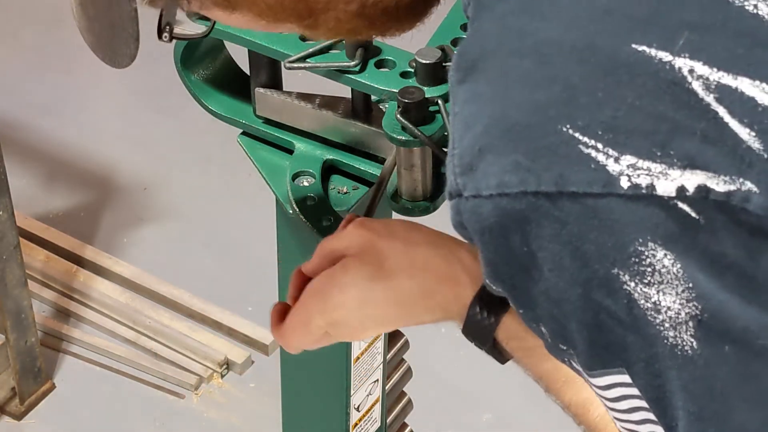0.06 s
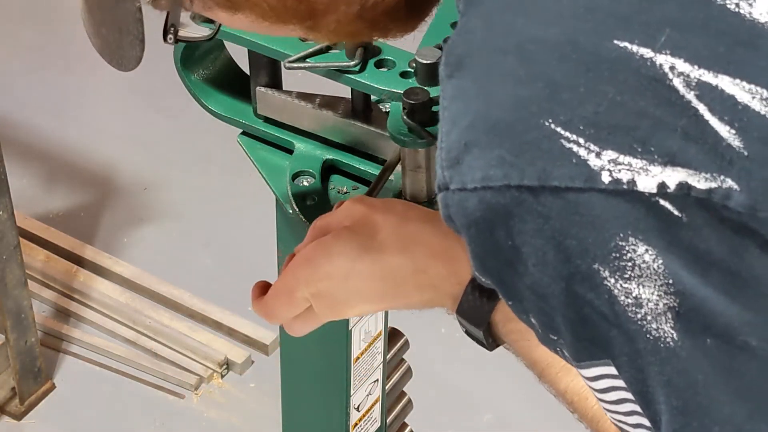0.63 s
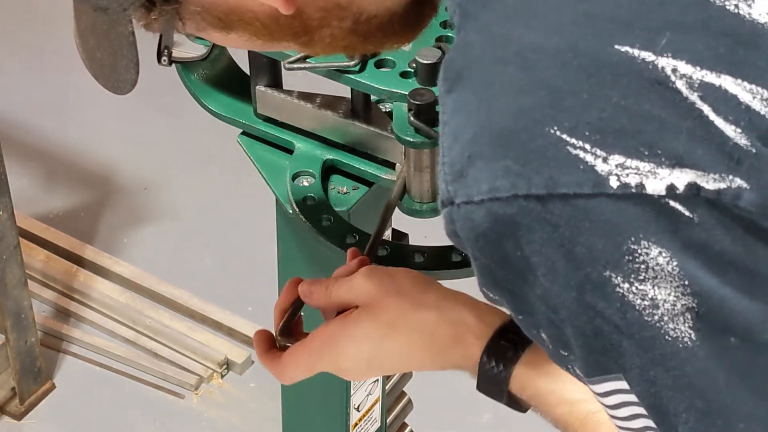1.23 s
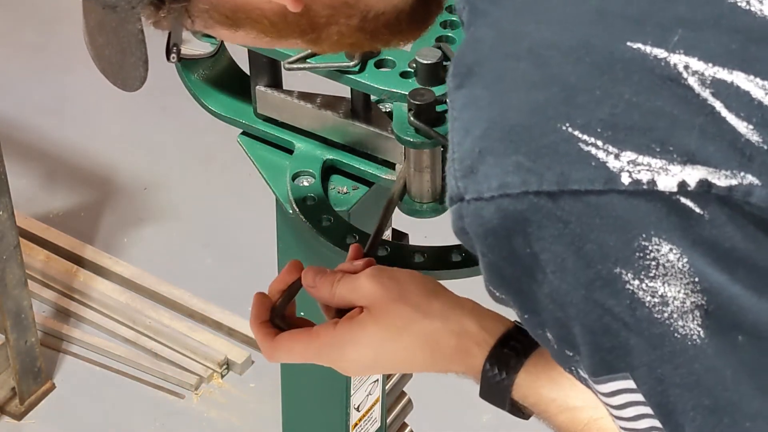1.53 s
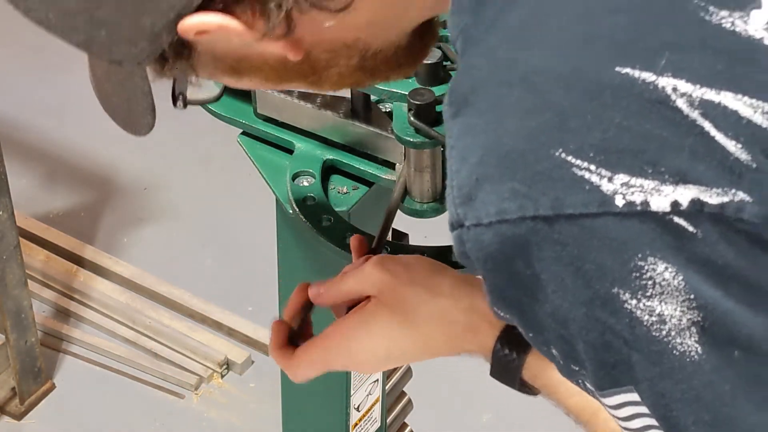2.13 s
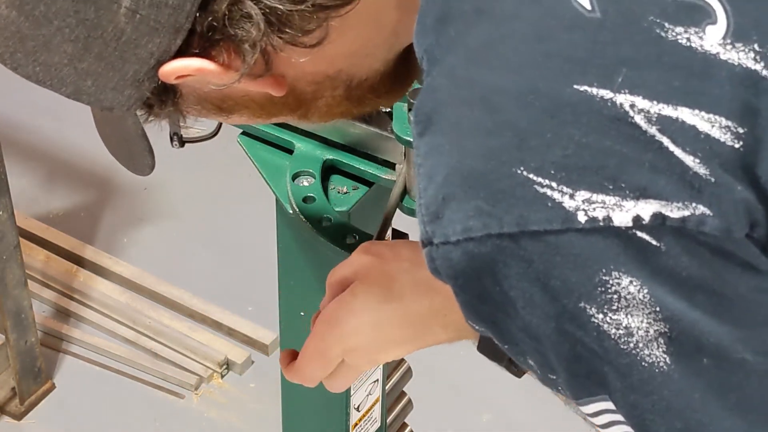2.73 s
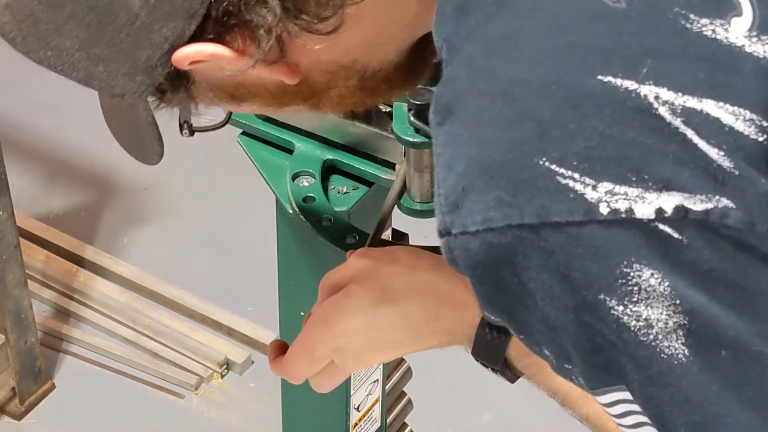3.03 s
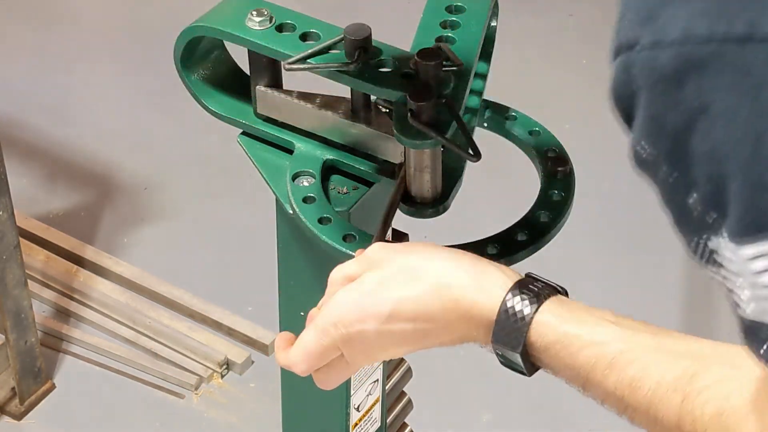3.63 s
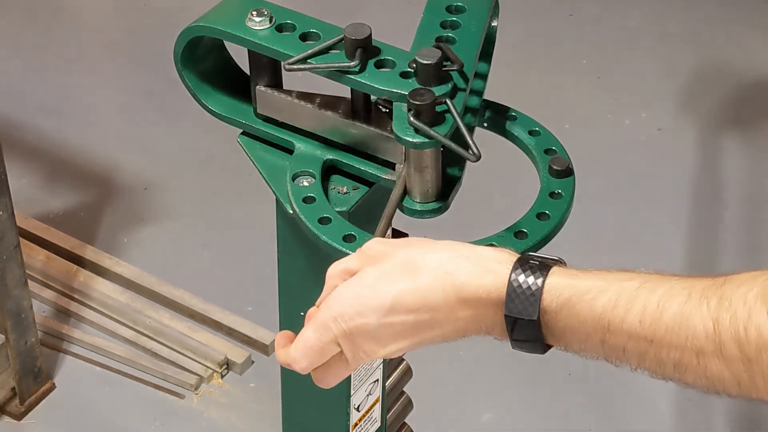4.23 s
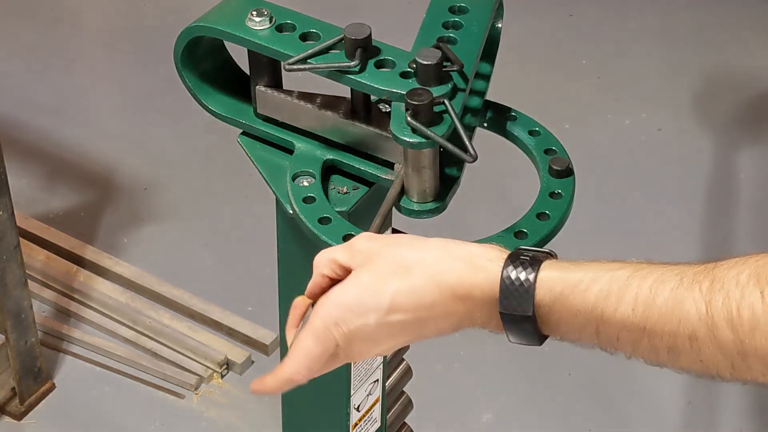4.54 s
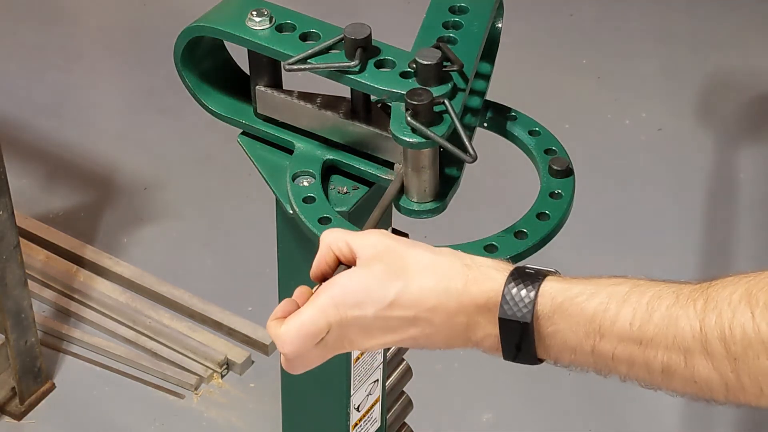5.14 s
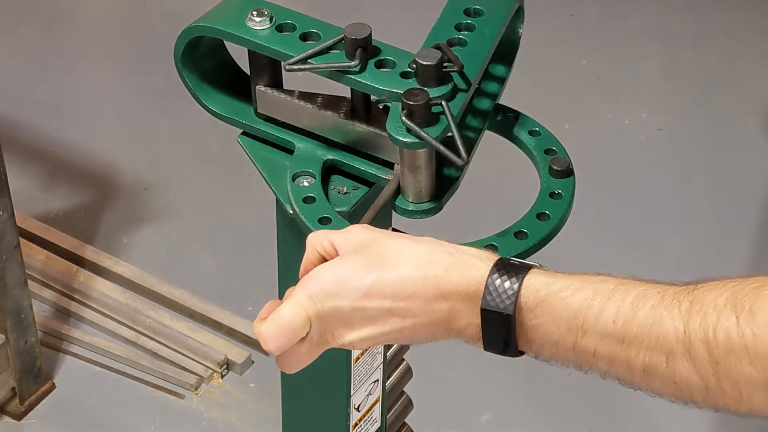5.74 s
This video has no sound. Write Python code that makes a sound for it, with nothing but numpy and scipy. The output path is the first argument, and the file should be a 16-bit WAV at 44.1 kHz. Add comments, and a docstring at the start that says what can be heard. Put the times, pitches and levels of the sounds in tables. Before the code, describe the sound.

In a small, hard-walled workshop, a steel die drops into a manual bar bender with one sharp, bright clank that rings briefly. Loose metal parts then knock lightly, with very faint squeaks and a soft rub of the bending arm. Near the end a steel bar hits its stop with a second, quieter ringing clank, and a low hum swells. The sound is close, with a short echo and faint hiss.

```python
"""Steel clanks on a manual bar bender in a small, hard-walled workshop.
A die clanks home, later the round bar drops against its stop; between them loose parts knock, squeak
and slide. Each impact excites a dense crowd of short-lived modes and a few long-ringing ones, and the
room adds a diffuse echo. Beneath lie a low rumble, a hum that swells near the end, and steady hiss."""
import sys
import numpy as np
from scipy import signal
from scipy.fft import rfft, irfft
from scipy.io import wavfile

SR = 44100
rng = np.random.default_rng(int(sys.argv[2]) if len(sys.argv) > 2 else 0)


def transcribe(u):
    """Save the signal u as a 16-bit wav file named by the first command-line argument.

    u: samples, shape (n,) or (channels, n), limited to [-1, 1]; the rate is SR.
    q: integer samples, one column per channel.
    """
    v = np.clip(np.atleast_2d(u).T, -1, 1)
    q = np.round(v * 32767).astype(np.int16)
    wavfile.write(sys.argv[1], SR, q)


N = 254442
TIME = np.arange(N) / SR

# Each row: start in seconds, level in dB, treble in dB, chatter time in seconds, spot resonance in Hz.
DIE_CONTACTS = [(.9035, -39, -13, 0.11, 2900), (.9095, -35.5, 0, 0.097, 12800),
                (.9145, -23, -11, 0.027, 3000), (.9337, -12, 10, .011, 11900),
                (.9382, -10.5, 2.5, 0.013, 3500), (.947, -22, 4, .045, 200)]
# Short-lived modes. Each row: frequency in Hz, relative level in dB.
DIE_SPECTRUM = [(110, -24), (210, -13), (480, -31.5), (1200, -15), (2000, -5), (3200, 1), (5100, -3.5),
                (5900, -11.5), (7500, -5), (9900, -8), (10700, -19.5), (11900, -2.5), (12600, -8.5),
                (15000, -1.5)]
# Long modes. Each row: frequency in Hz, relative level in dB, time to decay by 60 dB in seconds.
DIE_RING = [(128, -28, .7), (2252, -9, .45), (2738, -3, .4), (3186, -8, .45), (3254, -9, .35),
            (3493, -8, .5), (3570, 2, .33), (4131, -11, .5), (4430, -4, .42), (4461, -6, .38),
            (5092, -6, .38), (7022, -7, .36), (7062, -7, .38), (7154, -6, .35), (7192, -1, .28),
            (7716, -4, .34), (7746, -4, .32), (7784, -7, .38), (7881, -2, .35), (9041, -10, .32),
            (9969, -8, .25), (10112, -9, .26), (12047, -5, .24), (14077, -9, .24), (14559, -5, .18),
            (15226, -6, .22), (15530, -6, .23)]

def die_clank():
    """Impact excitation: the die seats in a quick run of contacts, each driving its modes."""
    return strike(DIE_CONTACTS, DIE_SPECTRUM, DIE_RING, ring_db=-3.5, room_db=1.33, coherent_hz=7050,
                  rise_s=0.00021, spot_width=0.059, spot_db=2, bass_db_per_octave=0.87, pan_db=6)

# Each row: start in seconds, level in dB, treble in dB, chatter time in seconds, spot resonance in Hz.
BAR_CONTACTS = [(4.9305, -46, -3.5, 0.063, 1495), (4.9528, -27.5, 11, 0.079, 14700),
                (4.957, -21, 6.5, 0.039, 3530), (4.9652, -27, -9, 0.018, 3080),
                (5.063, -39, -12, 0.016, 2560)]
# Short-lived modes. Each row: frequency in Hz, relative level in dB.
BAR_SPECTRUM = [(110, -32.5), (220, -21), (380, -8), (580, -21.5), (1200, -10), (2200, -1), (3200, 5.5),
                (4000, -2), (5600, -12), (7400, -6.5), (8200, -14.5), (9200, -11), (11500, -15),
                (15500, -13.5)]
# Long modes. Each row: frequency in Hz, relative level in dB, time to decay by 60 dB in seconds.
BAR_RING = [(1900, -13, .42), (2166, -13, .5), (2390, -5, .36), (2455, -4, .43), (2686, -4, .36),
            (2740, -8, .33), (2874, -5, .4), (3041, -3, .4), (3256, -2, .34), (3407, -6, .4),
            (3445, -5, .32), (3497, -1, .44), (4433, -11, .42), (4570, -12, .33), (6704, -8, .28),
            (7151, -13, .33), (7472, -3, .27), (7548, -6, .32), (8890, -12, .28), (8925, -10, .27),
            (9937, -13, .29), (14100, -11, .2)]

def bar_drop():
    """Inelastic collision: the bar hits its stop, rings and makes one small rebound."""
    return strike(BAR_CONTACTS, BAR_SPECTRUM, BAR_RING, ring_db=-2.5, room_db=-0.5, coherent_hz=5000,
                  rise_s=0.00086, spot_width=0.036, spot_db=9.5, bass_db_per_octave=2.3, pan_db=1.2)

# Each row: start in seconds, level in dB, treble in dB, chatter time in seconds, spot resonance in Hz.
FRAME_CONTACTS = [(.662, -49.5, -3, 0.084, 4600), (0.7279, -48, -4, 0.041, 2330),
                  (0.739, -43, 3, .03, 2590), (.832, -57, 10, 0.067, 1480), (.888, -51.5, 7.5, 0.34, 3100),
                  (1.253, -32, 4, 0.025, 4160), (1.663, -44, -1.5, 0.046, 4270),
                  (2.099, -59.5, -2, .1, 1800), (2.127, -51.5, -6, 0.066, 2850),
                  (2.591, -56.5, 2, .07, 3520), (2.777, -48, 19.5, 0.018, 2550),
                  (3.672, -62.5, 12, 0.11, 2900), (4.057, -45, 13, 0.039, 6200),
                  (4.239, -47.5, -1, .06, 2520), (4.293, -40.5, -21, 0.016, 2800),
                  (4.717, -47.5, -9.5, 0.053, 3500), (4.764, -47, -5, 0.0095, 3040),
                  (4.816, -49, -5, 0.015, 3200), (5.335, -51.5, 5, 0.1, 2900)]
# Short-lived modes. Each row: frequency in Hz, relative level in dB.
FRAME_SPECTRUM = [(120, -12.5), (300, -10.5), (600, -11.5), (1000, -2.5), (1900, -1), (3200, -1.5),
                  (4400, -10), (5600, -14.5), (7300, -16.5), (11000, -21), (15500, -22)]
# Long modes. Each row: frequency in Hz, relative level in dB, time to decay by 60 dB in seconds.
FRAME_RING = [(1040, -7, .3), (1790, -3, .22), (2330, -2, .25), (2920, 0, .2), (3210, -5, .25),
              (4130, -6, .38), (4620, -10, .25), (5950, -17, .22), (7200, -16, .22)]

def frame_knocks(lead_s=0.005, touch_db=-11.5):
    """Double impact: a loose part touches the frame lightly with one edge, then falls home."""
    touches = [(s - lead_s, db + touch_db, *rest) for s, db, *rest in FRAME_CONTACTS]
    contacts = touches + list(FRAME_CONTACTS)
    return strike(contacts, FRAME_SPECTRUM, FRAME_RING, ring_db=0, room_db=1.2, coherent_hz=3000,
                  rise_s=0.0016, spot_width=0.09, spot_db=8, bass_db_per_octave=10, pan_db=1)

def strike(contacts, spectrum, modes, ring_db, room_db, coherent_hz, rise_s,
           spot_width, spot_db, bass_db_per_octave, pan_db):
    """Modal superposition: dense modes merge into an echoing crack; lightly damped ones ring on."""
    size = SR * 3 // 5
    t, hz = np.arange(size) / SR, bins(size)
    mode_hz, mode_db, mode_t60 = np.transpose(modes)[:, :, None]
    # each mode reaches each channel with its own phase
    arrival_phase = 2 * np.pi * rng.random(len(modes)) + 0.9 * rng.standard_normal((2, len(modes)))
    free_ring = fade(t, mode_t60)
    cracks, energy = np.zeros((2, N + size)), np.zeros((len(modes), N + size))
    for s, db, treble_db, chatter_s, spot_hz in contacts:
        # heavy spots, ringing below 3100 Hz, add bass; a hard contact trades bass for treble
        bass_db = bass_db_per_octave * np.log2(3100 / spot_hz) - 0.25 * treble_db
        colour_db = on_log_axis([(900, bass_db), (2400, 0.018), (3800, 0), (9000, treble_db)], hz)
        colour_db += spot_db / (1 + ((hz / spot_hz - 1) / spot_width) ** 2)
        chatter = fade(t, chatter_s)
        crack = noise_pair(spectrum, size, coherent_hz, colour_db) * chatter * (1 - np.exp(-t / rise_s))
        swing = undb(db + mode_db + np.interp(mode_hz, hz, colour_db)) * free_ring * (1 - chatter)
        start = int(s * SR)
        cracks[:, start:start + size] += undb(db) * crack
        # longer chatter stores more energy in the modes
        energy[:, start:start + size] += chatter_s * swing ** 2
    cracks, rings = cracks[:, :N], np.zeros((2, N))
    live = np.flatnonzero(energy[0, :N])
    # echoes keep shifting each mode's phase, so the ring is less glassy
    phase = 2 * np.pi * mode_hz * TIME[live] + 0.55 * np.array([walk(45)[live] for _ in modes])
    vibration = np.sqrt(energy[:, live]) * np.exp(1j * phase)
    rings[:, live] = (np.exp(1j * arrival_phase) @ vibration).imag
    echo = reverberation(cracks, build_s=0.0036, coherent_hz=900)
    sound = cracks + undb(ring_db) * rings + undb(room_db) * echo
    return sound * undb(np.array([[pan_db], [-pan_db]]) / 2)

# Each row: start in seconds, length in seconds, first and last frequency in Hz, level in dB.
SQUEAK_GLIDES = [(.57, .12, 4150, 4050, -77), (1.57, .14, 3350, 3150, -75), (1.72, .33, 3150, 2950, -84)]

def squeaks(waver=0.0088, uneven_db=3, room_db=3):
    """Stick-slip friction: dry steel gives thin, rough tones that sink as the motion slows."""
    tones = np.zeros(N)
    for s, length, first_hz, last_hz, db in SQUEAK_GLIDES:
        progress = np.clip((TIME - s) / length, 0, 1)
        hz = (first_hz + (last_hz - first_hz) * progress) * (1 + waver * walk(500))
        envelope = undb(db + uneven_db * walk(90)) * np.sin(np.pi * progress)
        tones += envelope * np.sin(2 * np.pi * np.cumsum(hz) / SR)
    echo = reverberation(np.array([tones, tones]), build_s=0.004, coherent_hz=895)
    return tones + undb(room_db) * echo

# Each row: time in seconds, relative level of the rubbing in dB.
ARM_EFFORT = [(2.4, -74), (3.63, -70), (4.13, -63), (4.53, -68.5), (4.98, -68), (5.09, -71), (5.77, -66.5)]
# Each row: frequency in Hz, relative level in dB.
ARM_SPECTRUM = [(150, -12), (230, 4.5), (310, -7.5), (450, -4), (900, 3.5), (1200, -1.5), (1800, -3.5),
                (3000, -8), (5000, -22.5), (8000, -18.5), (15000, -25.5)]

def sliding_arm(rub_db=2):
    """Sliding friction: the bending arm rubs round its pivot, louder with greater effort."""
    level_db = rub_db + curve(ARM_EFFORT, TIME) + 0.7 * walk(14)
    return noise_pair(ARM_SPECTRUM, N, coherent_hz=570) * undb(level_db)

# Each row: peak time in seconds, length in seconds, frequency in Hz, bandwidth in Hz, peak level in dB.
NOISE_SWELLS = [(.085, 0.25, 1760, 1240, -59.5), (0.278, 0.19, 1700, 1800, -67.5),
                (0.12, 0.97, 420, 69.6, -78.5), (0.785, 0.21, 205, 68, -64),
                (2.182, 0.17, 1000, 230.6, -62), (3.91, 0.85, 218.4, 36.76, -70.5),
                (3.92, 1.25, 450.2, 160, -70.5), (4.071, 0.56, 856, 200, -64.5),
                (4.1, 0.48, 14500, 3100, -70.5), (4.09, 0.38, 6900, 3500, -70.5),
                (4.672, 0.4, 149.3, 60.3, -63.5), (5.34, 1.8, 380, 118.8, -73)]

def noise_swells():
    """Narrow-band noise in brief swells: a low thud, hollow groans and thin rubbing hiss."""
    sound = 0
    for peak_s, length, hz, width, db in NOISE_SWELLS:
        band_db = -10 * np.log10(1 + (2 * (bins(N) - hz) / width) ** 4)
        band = noise_pair([(1, 0), (SR, 0)], N, coherent_hz=597, colour_db=band_db)
        swell = np.cos(np.pi * np.clip((TIME - peak_s) / length, -0.5, 0.5))
        sound += undb(db) * swell * band / band.std()
    return sound

# Each row: frequency in Hz, reverberation time in seconds.
ROOM_DECAY = [(150, 0.17), (1000, 0.66), (3000, 0.42), (7500, 0.41), (11000, 0.31), (15500, 0.085)]

def reverberation(sound, build_s, coherent_hz):
    """Diffuse reflection: echoes build quickly, linger in the midrange and die first at the very top."""
    size = SR * 4 // 5
    t, hz = np.arange(size) / SR, bins(size)
    echoes = rfft(noise_pair([(1, 0), (SR, 0)], size, coherent_hz))
    tail = 0
    for band_hz, t60 in ROOM_DECAY:
        band = on_log_axis([(f, f == band_hz) for f, _ in ROOM_DECAY], hz)
        tail += irfft(echoes * band, size) * fade(t, t60)
    tail *= 1 - np.exp(-t / build_s)
    return signal.fftconvolve(sound, tail / np.sqrt(np.sum(tail ** 2) / 2), axes=1)[:, :N]

# Each row: frequency in Hz, relative level in dB.
RUMBLE_SPECTRUM = [(22, -35.5), (38, -19), (58, 8), (80, -3), (115, -2.5), (160, -2), (220, -11.5),
                   (300, -28.5), (600, -49.5)]

def rumble(quiet_db=-63.5, loud_db=-58, grows_s=4.48, rise_s=0.23, heave_db=2.5):
    """Amplitude-modulated noise: the shop's low rumble heaves, and grows shortly before the hum does."""
    level_db = curve([(grows_s, quiet_db), (grows_s + rise_s, loud_db)], TIME)
    return noise_pair(RUMBLE_SPECTRUM, N, coherent_hz=453) * undb(level_db + heave_db * walk(8))

# Each row: frequency in Hz, relative level in dB.
HUM_PARTIALS = [(58.5, -8.5), (113.5, -3), (172, -18), (228, -23.5)]

def machine_hum(idle_db=-67.5, full_db=-49, swells_s=5.165, rise_s=0.2, waver=0.017, throb_db=2):
    """A line spectrum: partials waver together in pitch as the hum idles, swells and holds."""
    warped_time = np.cumsum(1 + waver * walk(24)) / SR
    hum = sum(undb(db + throb_db * walk(9)) * np.sin(2 * np.pi * (hz * warped_time + rng.random()))
              for hz, db in HUM_PARTIALS)
    level_db = curve([(swells_s, idle_db), (swells_s + rise_s, full_db)], TIME)
    return np.sqrt(2) * hum * undb(level_db)

# Each row: frequency in Hz, relative level in dB.
HISS_SPECTRUM = [(100, 1), (400, 14), (900, 3), (2000, 3), (4500, 1.5), (7200, 1), (10500, -6), (13000, 0),
                 (15500, 3.5)]

def hiss(level_db=-70):
    """Stationary broadband noise of the air and the microphone."""
    return noise_pair(HISS_SPECTRUM, N, coherent_hz=586) * undb(level_db)

def noise_pair(spectrum, size, coherent_hz, colour_db=0):
    """Partial coherence: two channels of shaped noise that agree below coherent_hz."""
    hz = bins(size)
    gain = undb(on_log_axis(spectrum, hz))
    mid, side = rfft(rng.standard_normal((2, size)))
    coherence = 1 / (1 + (hz / coherent_hz) ** 2)
    pair = mid * np.sqrt((1 + coherence) / 2) + np.array([side, -side]) * np.sqrt((1 - coherence) / 2)
    return irfft(pair * gain * undb(colour_db) / np.sqrt(np.mean(gain ** 2)), size)

def fade(t, t60):
    """Exponential decay of a free vibration."""
    return np.exp(-np.log(1000) * t / t60)

def walk(rate_hz):
    """Smooth random fluctuation with a spread near 1."""
    knots = rng.standard_normal(6000)
    return np.interp(TIME * rate_hz, np.arange(len(knots)), knots)

def undb(db):
    """Decibels to amplitude ratio."""
    return 10 ** (np.asarray(db) / 20)

def curve(rows, at):
    """Linear interpolation through the rows."""
    return np.interp(at, *np.transpose(rows))

def on_log_axis(rows, hz):
    """Interpolation on a log-frequency axis."""
    points, values = np.transpose(rows)
    return np.interp(np.log(hz + 1), np.log(points), values)

def bins(size):
    """Frequencies of a real Fourier transform."""
    return np.arange(size // 2 + 1) * SR / size

def scene():
    """Superposition: impacts, friction, noise swells and background add."""
    impacts = die_clank() + bar_drop() + frame_knocks()
    friction = squeaks() + sliding_arm()
    return impacts + friction + noise_swells() + rumble() + machine_hum() + hiss()

# Two microphone ports. Each row: frequency in Hz, left minus right level in dB.
PORT_BALANCE = [(100, 0), (3000, -1.5), (10000, -2.5), (12500, -2.5), (15500, -15.5)]

def record(dry, cutoff_hz=15750):
    """Frequency response: the right port is brighter, and a low-pass cuts the highest treble."""
    lean_db = on_log_axis(PORT_BALANCE, bins(N))
    heard = irfft(rfft(dry) * undb(np.array([lean_db, -lean_db]) / 2), N)
    return signal.sosfilt(signal.ellip(8, 0.2, 70, cutoff_hz, fs=SR, output="sos"), heard)

dry = scene()
out = record(dry)
transcribe(out)
```